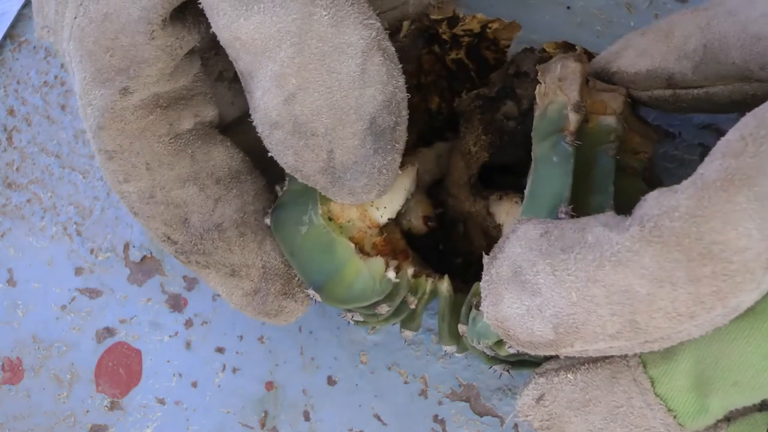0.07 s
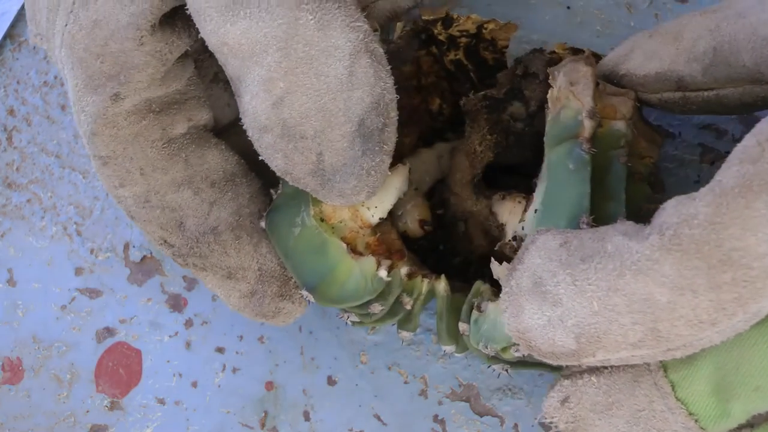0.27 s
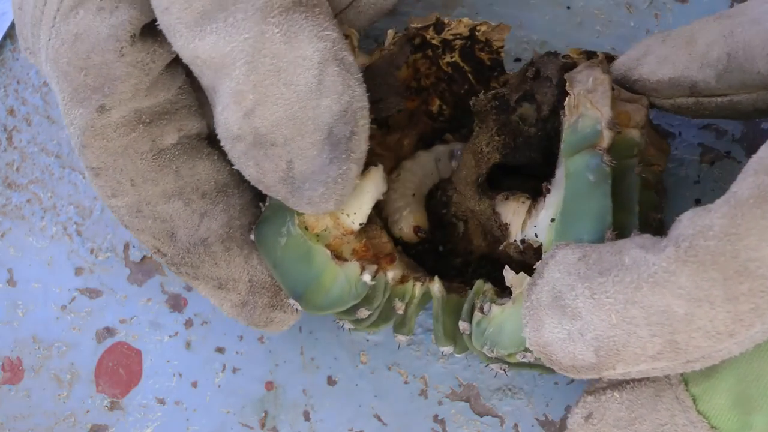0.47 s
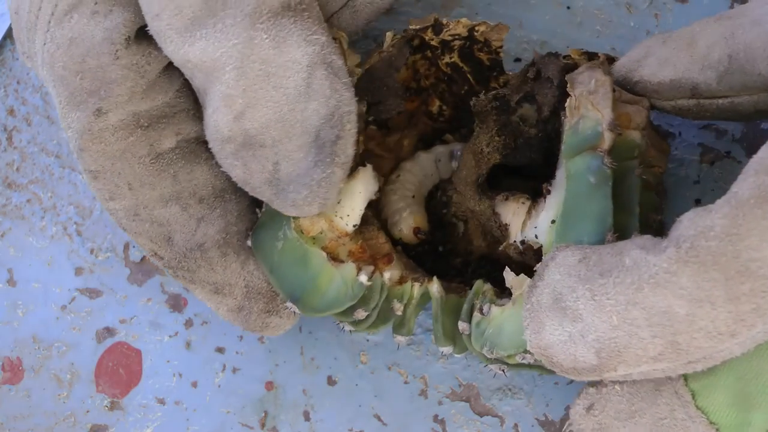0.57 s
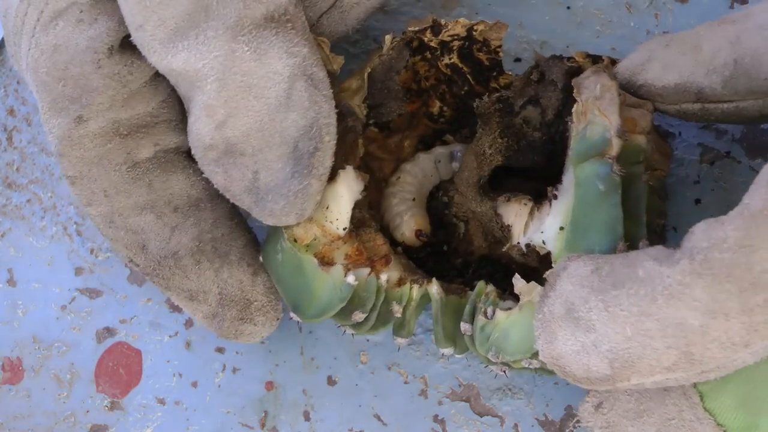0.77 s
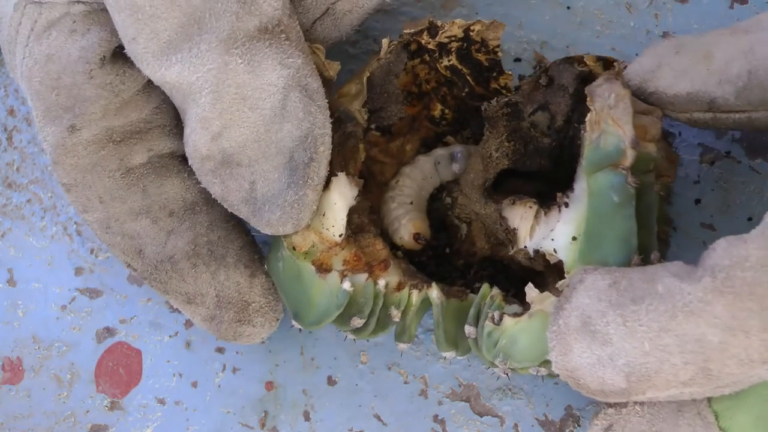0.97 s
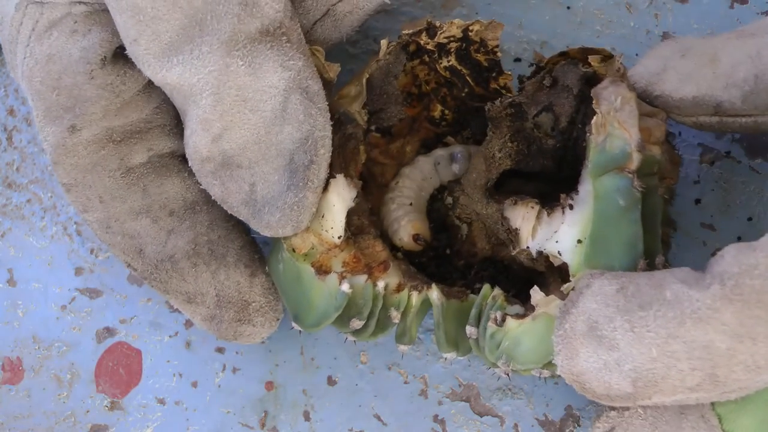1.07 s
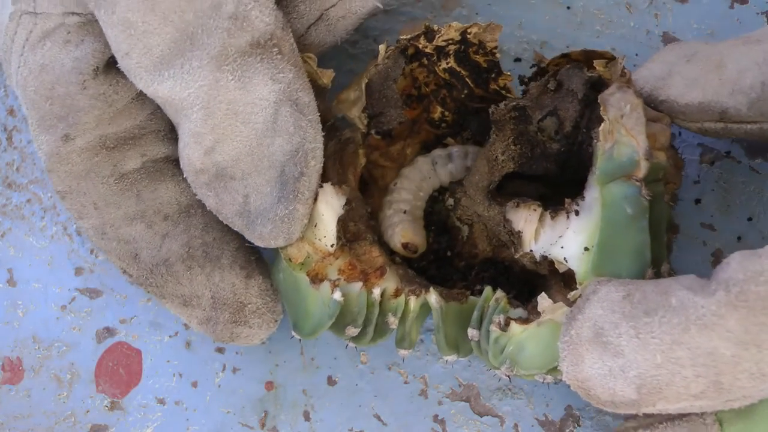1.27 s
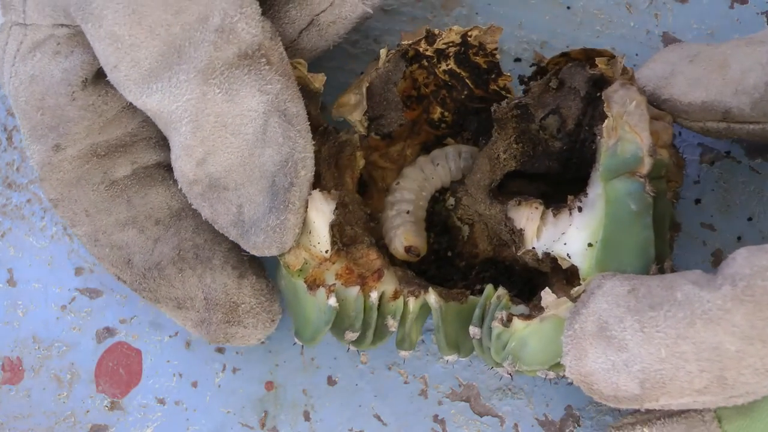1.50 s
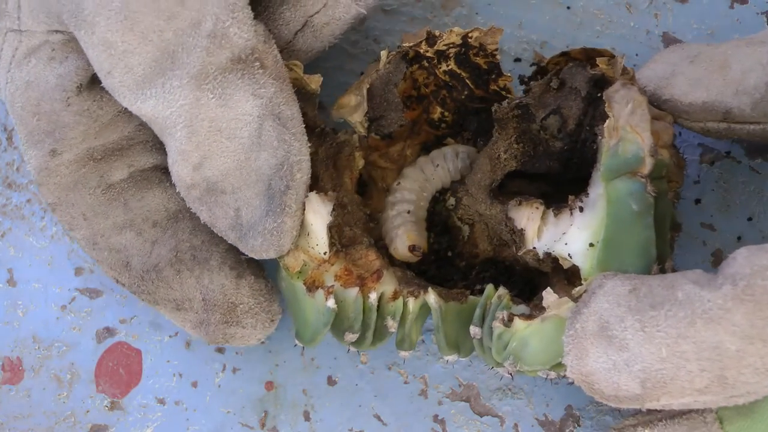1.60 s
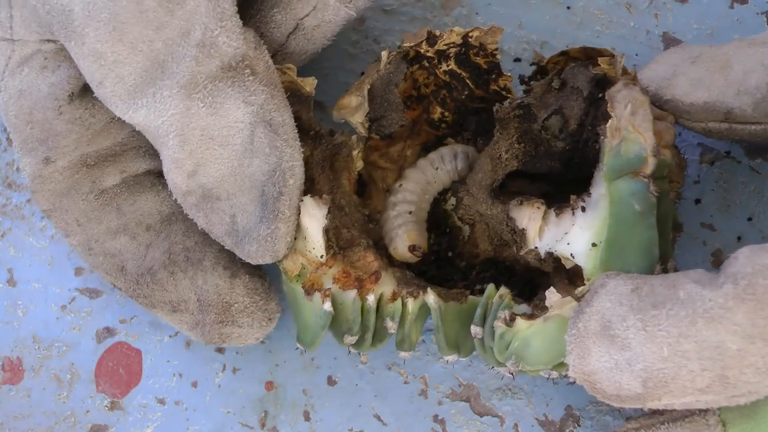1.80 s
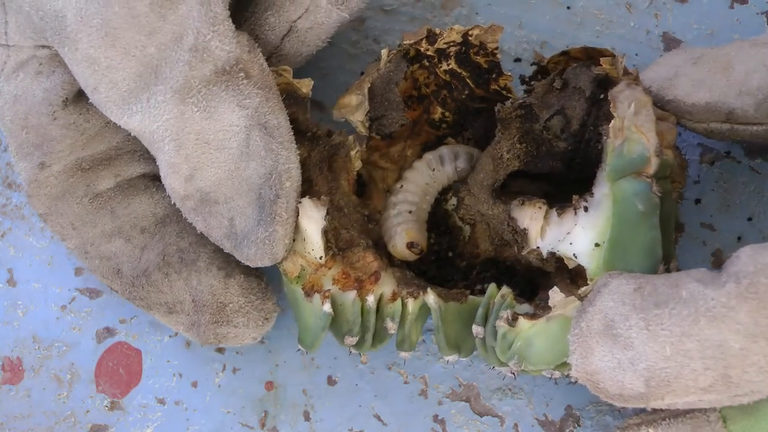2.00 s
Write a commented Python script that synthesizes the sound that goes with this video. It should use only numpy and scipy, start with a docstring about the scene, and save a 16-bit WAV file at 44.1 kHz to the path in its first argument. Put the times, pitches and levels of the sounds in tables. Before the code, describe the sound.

Crisp little cracks and damp crackling come from a cactus being pulled apart close to the microphone in a small room. Gloves rub, fibres snap in bursts, then one flicked spine rings thinly as air briefly rumbles on the microphone.

```python
"""Prying open a cactus

Gloved hands pry a cut cactus open on a table, close to the microphone. Moist pulp crackles under
the rubbing gloves, fibres crack in bursts of tiny ruptures, and stiff spines snap or are flicked
into a bright, damped ring. The table and a small room reflect the clicks and crackle, while air
nudges the microphone over low room noise, mains hum and a faint whine."""
import sys
import numpy as np
from scipy import signal
from scipy.fft import rfft, irfft, next_fast_len
from scipy.io import wavfile

SR = 44100
rng = np.random.default_rng(int(sys.argv[2]) if len(sys.argv) > 2 else 0)


def int16_out(signal):
    """Quantize to a 16-bit WAV file."""
    q = np.round(np.clip(np.atleast_2d(signal).T, -1, 1) * 32767)
    wavfile.write(sys.argv[1], SR, q.astype(np.int16))


N = 90404


def undb(db):
    """Amplitude grows tenfold for every 20 dB."""
    return 10 ** (np.asarray(db) / 20)


def unit(x):
    """Normalisation to an rms of 1."""
    return x / np.sqrt(np.mean(x ** 2) + 1e-20)


def burst(x, db):
    """Equal energy: scale a click to match 5 ms of steady sound at this level."""
    return x * undb(db) * np.sqrt(.005 * SR / np.sum(x ** 2))


def band(x, lo_hz, hi_hz, order=3):
    """Causal band-pass filtering."""
    sos = signal.butter(order, [lo_hz, min(hi_hz, SR / 2 - 1)], "band", fs=SR, output="sos")
    return signal.sosfilt(sos, x)


def colour(x, points):
    """Minimum-phase filtering through (Hz, dB) points: folding the cepstrum makes it causal."""
    hz, db = np.array(points, float).T
    size = 2 * next_fast_len(len(x))
    bin_hz = np.arange(size // 2 + 1) * SR / size
    gain = undb(np.interp(np.log(bin_hz + 1), np.log(hz), db))
    cepstrum = irfft(np.log(gain))
    cepstrum[1:size // 2] *= 2
    cepstrum[size // 2 + 1:] = 0
    return irfft(rfft(x, size) * np.exp(rfft(cepstrum)))[:len(x)]


def envelope(rows, column=1):
    """Gain over time, interpolated in decibels between rows of (seconds, dB, ..)."""
    rows = np.array(rows)
    return undb(np.interp(np.arange(N) / SR, rows[:, 0], rows[:, column]))


def decay(t, t60):
    """Exponential damping: a fall of 60 dB in t60 seconds."""
    return np.exp(-np.log(1000) * t / t60)


def add(out, start_s, x):
    """Superposition: mix x in from start_s."""
    k = max(int(start_s * SR), 0)
    out[k:k + len(x)] += x[:max(N - k, 0)]


CLICK_MS = np.arange(1024) * 1000 / SR  # time axis of one click

# Spectrum of the room noise. Each row: frequency in Hz, gain in dB.
ROOM_NOISE_SPECTRUM = [(15, -7), (25, -5.5), (60, -3.5), (120, 0.5), (200, -0.5), (300, -5), (430, -5),
                       (510, -12), (750, -7), (950, -17), (1300, -19.5), (2200, -17), (4500, -18.5),
                       (8000, -27), (12000, -31), (16000, -31)]
# Its stereo side signal. Each row: frequency in Hz, gain relative to the mid in dB.
SIDE_SPECTRUM = [(30, -8), (100, -20.5), (300, -6.5), (1000, -8.5), (4000, -18.5), (15000, -6.5)]
# Narrow bands of the whine. Each row: centre in Hz, level in dB before the swell.
WHINE_BANDS = [(7795, -69), (8161, -68)]
# Swell of the whine. Each row: time in seconds, gain in dB.
WHINE_SWELL = [(.16, -5), (.25, -9), (.92, -15), (.99, 3), (1.3, -6), (1.6, -16), (1.7, -20)]
def background(noise_db=-55, hum_hz=118.9, hum_db=-67.5, whine_width_hz=79):
    """Broadband room noise and mains hum; noise in narrow bands is heard as a pitched whine."""
    t = np.arange(N) / SR
    mid, side = (unit(colour(rng.standard_normal(N), ROOM_NOISE_SPECTRUM)) for _ in range(2))
    noise = mid + colour(side, SIDE_SPECTRUM) * np.array([[1], [-1]])
    tones = undb(hum_db) * unit(np.sin(2 * np.pi * hum_hz * t))
    for hz, db in WHINE_BANDS:
        whine = band(rng.standard_normal(N), hz - whine_width_hz / 2, hz + whine_width_hz / 2, order=1)
        tones += undb(db) * envelope(WHINE_SWELL) * unit(whine)
    return undb(noise_db) * noise + tones


# Strength of the air on the microphone. Each row: time in seconds, level in dB.
DRAUGHT_LEVELS = [(0, -60), (.4, -85), (.7, -68), (.85, -58.5), (1.17, -61.5), (1.21, -44.5), (1.26, -48.5),
                  (1.305, -39), (1.34, -47), (1.5, -56), (1.68, -50.5), (1.76, -63), (2.05, -73)]
# Spectrum of its rumble. Each row: frequency in Hz, gain in dB.
DRAUGHT_SPECTRUM = [(15, -3), (35, -6.5), (70, 4.5), (120, 2), (200, -9.5), (500, -42), (2000, -85)]
def draught():
    """Air stirs at each microphone port on its own, so the two channels rumble incoherently."""
    rumble = np.array([unit(colour(rng.standard_normal(N), DRAUGHT_SPECTRUM)) for _ in range(2)])
    return rumble * envelope(DRAUGHT_LEVELS)


def grains(per_s, spread_db=3.5):
    """Shot noise: independent tiny clicks, a few much larger than the rest."""
    size = undb(spread_db * np.minimum(rng.exponential(size=N), 5))
    return (rng.random(N) < per_s / SR) * size * rng.choice([-1, 1], N)


# Work of the hands. Each row: time in seconds, pulp level and glove level in dB before their trims.
HANDLING_LEVELS = [(0.0, -66, -82), (0.24, -61, -49), (0.38, -73, -68), (0.5, -57, -49), (0.62, -61, -63.5),
                   (0.79, -62.5, -63.5), (0.92, -50.5, -48), (0.98, -55.5, -56), (1.1, -58.5, -50.5),
                   (1.17, -61, -77.5), (1.36, -50, -49.5), (1.48, -62.5, -68.5), (1.59, -84, -56),
                   (1.8, -70.5, -94), (2.05, -62, -66)]
# Spectra of moist pulp, rubbing gloves and small fibres parting. Each row: frequency in Hz, gain in dB.
PULP_SPECTRUM = [(700, -2), (1200, -3), (1800, 9), (2600, 5.5), (3500, 1.5), (5000, -4.5), (9000, -29)]
GLOVE_SPECTRUM = [(2000, -28), (3300, -21), (4600, 4.5), (7000, 5), (9000, 1), (15000, -6.5)]
TICK_SPECTRUM = [(900, -19), (2500, -1.5), (5000, 3.5), (9000, -3.5), (15000, -4)]
# Squeezes and rubs. Each row: peak time and length in seconds, peak level in dB, centre and width in Hz.
SQUEEZE_SWELLS = [(0.125, 0.021, -62, 3500, 3000), (.68, 0.032, -56.5, 11100, 7100),
                  (0.765, 0.016, -56.5, 1340, 500), (0.835, .08, -60.5, 404, 296),
                  (0.845, 0.046, -59, 2300, 1190), (1.058, 0.12, -52, 3200, 1390),
                  (1.311, 0.077, -55, 2100, 1400), (1.381, 0.02, -53, 2030, 1120),
                  (1.491, 0.12, -60, 2510, 400), (1.975, 0.061, -60, 4500, 3030)]
def rustle(pulp_per_s=1200, glove_per_s=1500, ticks_per_s=45,
           pulp_trim_db=-0.5, glove_trim_db=-2, ticks_db=-65.5):
    """Dense impulses from pulp and glove friction fuse into crackle; sparse fibre ticks stay distinct."""
    pulp = unit(colour(grains(pulp_per_s), PULP_SPECTRUM)) * envelope(HANDLING_LEVELS, column=1)
    gloves = unit(colour(grains(glove_per_s), GLOVE_SPECTRUM)) * envelope(HANDLING_LEVELS, column=2)
    ticks = unit(colour(grains(ticks_per_s), TICK_SPECTRUM))
    out = pulp * undb(pulp_trim_db) + gloves * undb(glove_trim_db) + ticks * undb(ticks_db)
    t = np.arange(N) / SR
    for peak_s, length_s, db, hz, width in SQUEEZE_SWELLS:
        crackle = band(grains(pulp_per_s), max(hz - width / 2, 100), hz + width / 2, order=2)
        swell = np.exp(-2 * ((t - peak_s) / length_s) ** 2)
        out += unit(crackle) * undb(db) * swell
    return out


def fracture(decay_ms, rise_ms=0.11, break_db=-3):
    """Fracture releases stress as one impulse and a dying run of tiny ruptures."""
    shape = np.exp(-CLICK_MS / decay_ms) * (1 - np.exp(-CLICK_MS / rise_ms))
    ruptures = unit(rng.standard_normal(len(shape)) * shape)
    first_break = unit(signal.unit_impulse(len(shape), 6))
    return ruptures + undb(break_db) * first_break


# Woody modes of the cactus. Each row: frequency in Hz, bandwidth in Hz, gain in dB.
BODY_MODES = [(2530, 390, 2), (2860, 180, -1.5), (3784, 450, 1), (4605, 280, 7)]
def cactus_body(x):
    """Resonance: the body reinforces sound near its natural frequencies."""
    return x + sum(undb(db) * signal.lfilter(*signal.iirpeak(hz, hz / width, fs=SR), x)
                   for hz, width, db in BODY_MODES)


# Fibres giving way. Each row: start in seconds, then level in dB over 5 ms in each of the four bands.
FIBRE_CRACKS = [(0.0296, -56, -48, -47, -58), (0.1714, -51, -51, -59, -67), (0.2069, -46, -53, -51, -51),
                (0.2997, -55, -52, -57, -58), (0.3468, -68, -49, -46, -47), (0.4132, -38, -34, -42, -51),
                (0.4277, -44, -41, -39, -42), (0.4296, -48, -42, -39, -35), (0.4674, -60, -52, -50, -61),
                (0.4855, -52, -45, -39, -42), (0.4979, -33, -29, -29, -33), (0.5013, -44, -41, -32, -32),
                (0.5303, -46, -58, -57, -55), (0.698, -49, -50, -51, -53), (0.7033, -51, -53, -57, -66),
                (0.7332, -50, -48, -51, -39), (0.761, -48, -51, -57, -63), (0.8284, -44, -46, -52, -56),
                (0.8335, -51, -51, -48, -55), (0.8405, -46, -47, -48, -48), (0.8507, -47, -48, -56, -50),
                (0.8681, -64, -49, -58, -57), (0.9523, -56, -54, -54, -68), (1.0247, -54, -41, -42, -41),
                (1.0395, -50, -48, -61, -69), (1.0488, -58, -54, -60, -63), (1.056, -41, -37, -47, -52),
                (1.0718, -48, -58, -65, -71), (1.0814, -37, -31, -42, -47), (1.1244, -42, -54, -67, -64),
                (1.3663, -46, -51, -52, -50), (1.4829, -54, -48, -56, -71), (1.5009, -61, -43, -55, -63),
                (1.6041, -73, -63, -43, -61), (1.6809, -61, -46, -57, -57), (1.7817, -61, -51, -59, -57),
                (1.8144, -65, -48, -56, -58), (1.8213, -55, -47, -50, -70), (2.0334, -52, -49, -55, -64)]
# Bands of a crack. Each row: lower edge in Hz, upper edge in Hz.
FIBRE_BANDS = [(1600, 3200), (3200, 6400), (6400, 11000), (11000, 16000)]
# Damping of a crack. Each entry: time constant of one band in milliseconds.
FIBRE_DECAYS = [1.06, 1.6, 2, 1.4]
def fibre_cracks(knock_db=-18, knock_decay_ms=2.5):
    """Impulsive excitation: each breaking fibre drives the body's modes over a dull knock of the flesh."""
    out = np.zeros(N)
    for start_s, *levels in FIBRE_CRACKS:
        for (lo, hi), db, decay_ms in zip(FIBRE_BANDS, levels, FIBRE_DECAYS):
            crack = band(fracture(decay_ms), lo, hi, order=4)
            add(out, start_s, burst(cactus_body(crack), db))
        knock = band(fracture(knock_decay_ms), lo_hz=1090, hi_hz=1810)
        add(out, start_s, burst(knock, levels[0] + knock_db))
    return out


# Breaking spines. Each row: start in seconds, ring level in dB over 5 ms, ring frequency in Hz,
# ring decay in milliseconds, splinter level in dB relative to the ring, splinter decay in milliseconds.
SPINE_SNAPS = [(.2136, -18, 8950, 1, -8, 1.3), (.2792, -32.5, 9100, 0.9, -11, 2.2),
               (0.886, -23, 11220, 1, -3, 2.2), (1.5906, -24.5, 9570, 1, -8, 1.3)]
# Spectrum of the splintering. Each row: frequency in Hz, gain in dB.
SPLINTER_SPECTRUM = [(300, -13), (1100, -40), (2300, -18.5), (4500, -1), (6000, -5), (9000, -2.5),
                     (12000, 2), (15000, 3.5), (17000, -48)]
def spine_snaps(rise_ms=0.08, wobble_depth=0.085, wobble_period_ms=0.96, upper_ratio=1.1, upper_db=-12):
    """Sudden release: a spine splinters broadly and excites two damped modes of wavering pitch."""
    out = np.zeros(N)
    wobble = 1 + wobble_depth * np.sin(2 * np.pi * CLICK_MS / wobble_period_ms)
    for start_s, db, hz, ring_ms, splinter_db, splinter_ms in SPINE_SNAPS:
        phase = 2 * np.pi * np.cumsum(hz * wobble) / SR
        modes = np.sin(phase) + undb(upper_db) * np.sin(upper_ratio * phase)
        ring = modes * np.exp(-CLICK_MS / ring_ms) * (1 - np.exp(-CLICK_MS / rise_ms))
        splinter = colour(fracture(splinter_ms), SPLINTER_SPECTRUM)
        add(out, start_s, burst(ring, db) + burst(splinter, db + splinter_db))
    return out


def microphone_jolt(lag_ms=0.82, peak_db=-29, rise_ms=1.03):
    """The first snap jolts the microphone: one critically damped pulse, alike in both channels."""
    out, age = np.zeros(N), CLICK_MS / rise_ms
    add(out, SPINE_SNAPS[0][0] + lag_ms / 1000, -undb(peak_db) * age * np.exp(1 - age))
    return out


# Modes of a flicked spine. Each row: frequency in Hz, initial level in dB, time to fall 60 dB in seconds.
FLICK_MODES = [(14400, -48, 0.65), (7830, -58, 1), (15731, -56, .4)]
def spine_flick(start_s=1.366):
    """Free vibration: one spine slips off a glove and rings thinly at its natural frequencies."""
    out, t = np.zeros(N), np.arange(N) / SR
    for hz, db, t60 in FLICK_MODES:
        add(out, start_s, undb(db) * np.sin(2 * np.pi * hz * t) * decay(t, t60))
    return out


# Echoes from table and hands. Each row: delay in milliseconds, gain in dB relative to the direct sound.
NEAR_REFLECTIONS = [(.93, -18.5), (1.9, -44.5), (2.9, -6), (8.2, -26), (9.2, -19)]
# Decay of the room. Each row: frequency in Hz, reverberation time in seconds.
REVERB_TIMES = [(1500, 0.18), (4000, 0.15), (10000, 0.12), (16000, 0.099)]
def room(x, early_db=-8.5, early_t60_s=0.055, tail_db=-11.5, side_gain=0.41, balance_db=-0.5):
    """Convolution with an impulse response: direct sound, near reflections, then a short diffuse tail."""
    t = np.arange(SR // 2) / SR
    near = signal.unit_impulse(len(t))
    for ms, db in NEAR_REFLECTIONS:
        near[int(ms * SR / 1000)] += undb(db)
    near /= np.sqrt(np.sum(near ** 2))
    hz, t60 = np.array(REVERB_TIMES).T
    edges_hz = np.geomspace(300, 18000, 9)
    tail = sum(band(rng.standard_normal((2, len(t))), lo, hi) * decay(t, np.interp(lo, hz, t60))
               for lo, hi in zip(edges_hz, edges_hz[1:]))
    tail *= 1 - np.exp(-t / 0.0072)  # the diffuse field takes time to build
    early = rng.standard_normal((2, len(t))) * decay(t, early_t60_s) * (1 - np.exp(-t / 0.00039))
    mid, side = (undb(tail_db) * unit(tail) + undb(early_db) * unit(early)) / np.sqrt(len(t))
    responses = [near * undb(sign * balance_db / 2) + mid + sign * side_gain * side for sign in (1, -1)]
    return np.array([signal.fftconvolve(x, response)[:N] for response in responses])


def scene():
    """Superposition: rustle, cracks and snaps pass through the room; the other sounds add directly."""
    ambience = background() + draught()
    cactus = rustle() + fibre_cracks() + spine_snaps()
    return ambience + room(cactus) + microphone_jolt() + spine_flick()


def record(dry, cutoff_hz=16000):
    """Band limiting: the recorder's steep low-pass filter removes the highest treble."""
    return signal.sosfilt(signal.ellip(8, .2, 70, cutoff_hz, fs=SR, output="sos"), dry)


dry = scene()
out = record(dry)
int16_out(out)
```